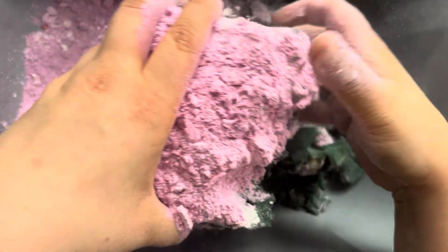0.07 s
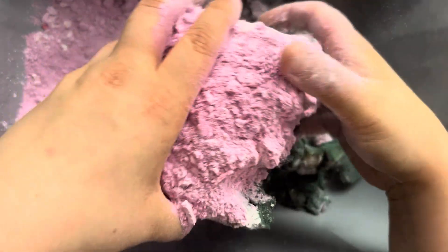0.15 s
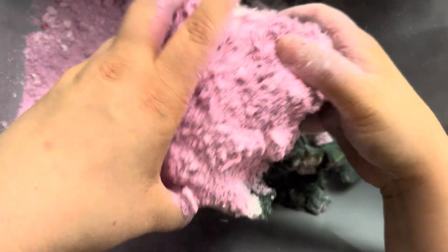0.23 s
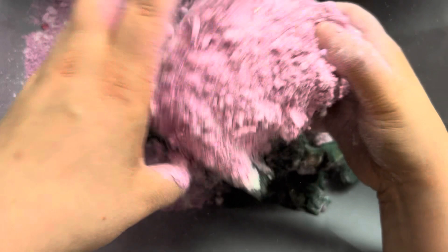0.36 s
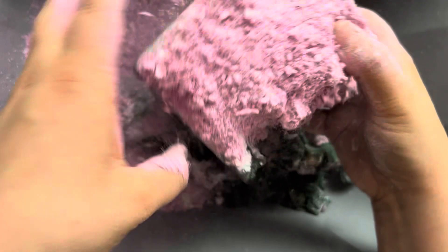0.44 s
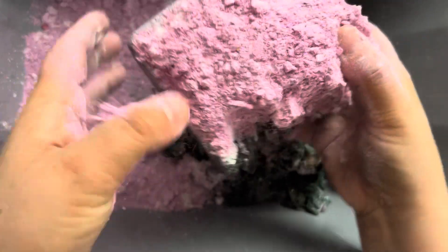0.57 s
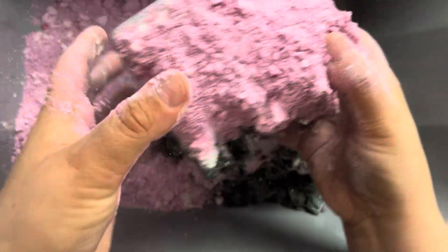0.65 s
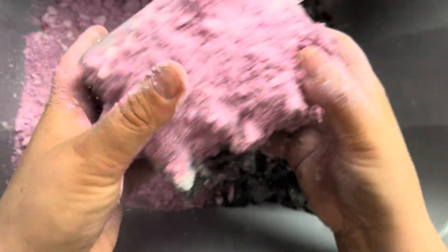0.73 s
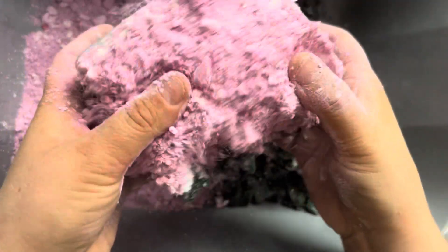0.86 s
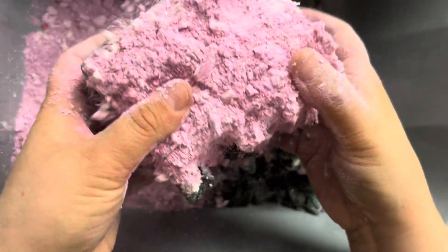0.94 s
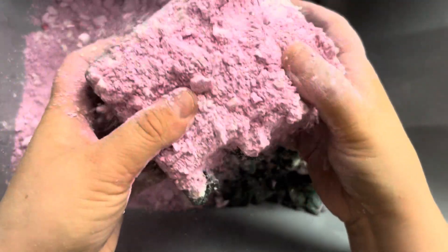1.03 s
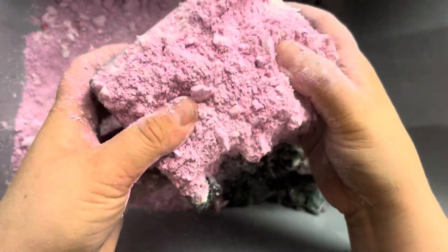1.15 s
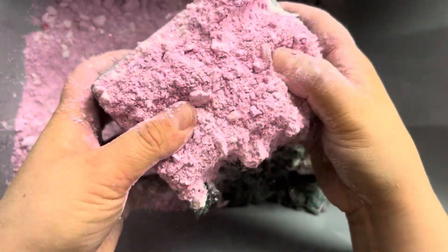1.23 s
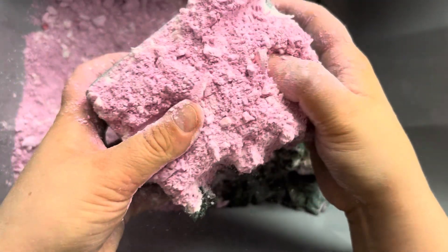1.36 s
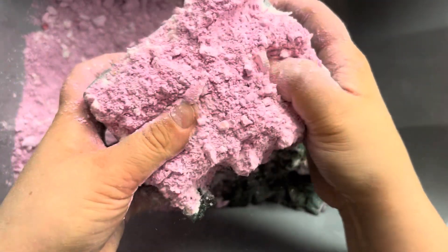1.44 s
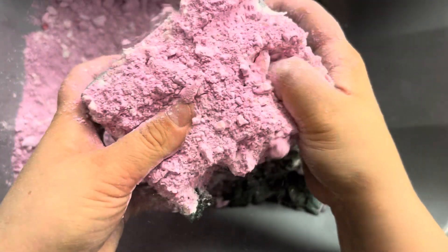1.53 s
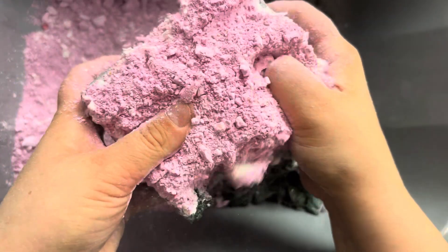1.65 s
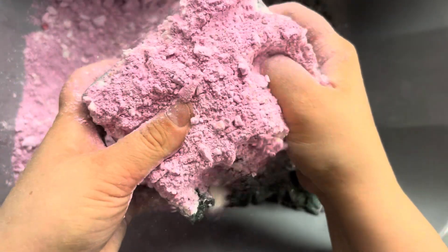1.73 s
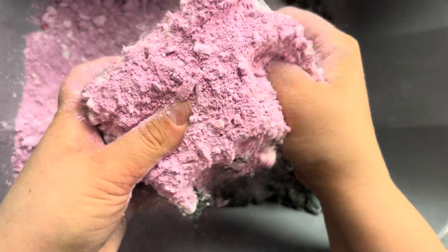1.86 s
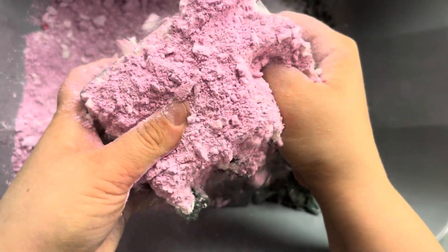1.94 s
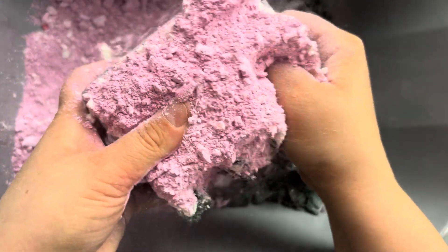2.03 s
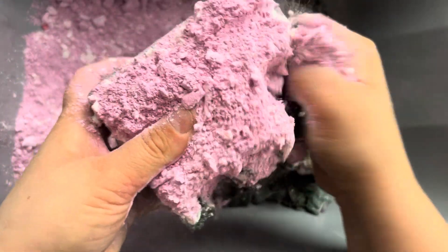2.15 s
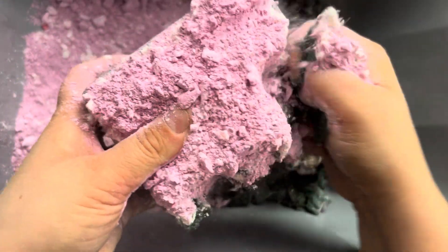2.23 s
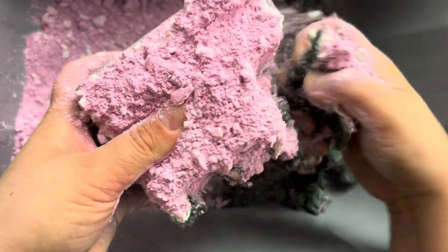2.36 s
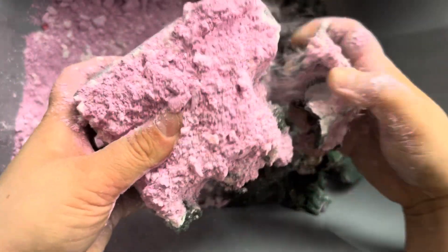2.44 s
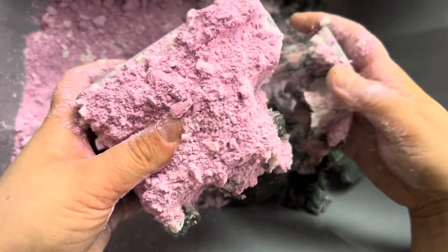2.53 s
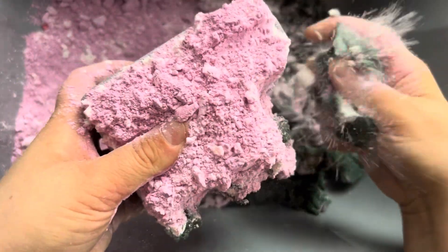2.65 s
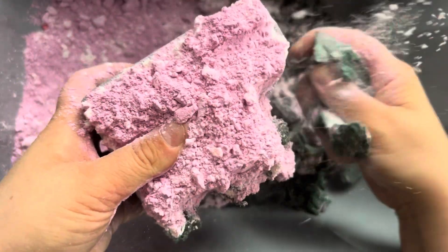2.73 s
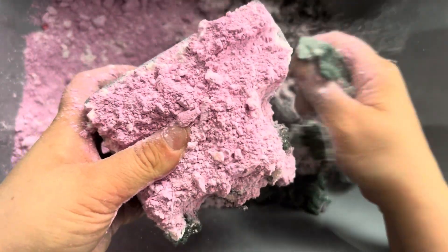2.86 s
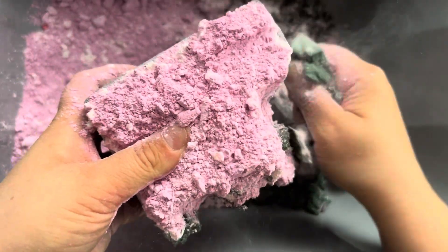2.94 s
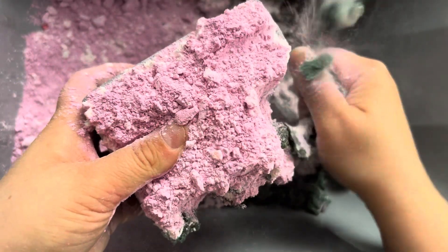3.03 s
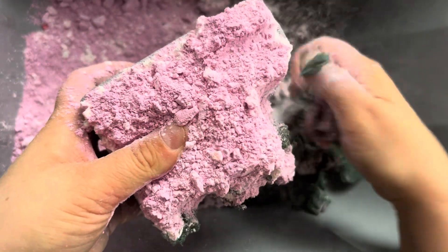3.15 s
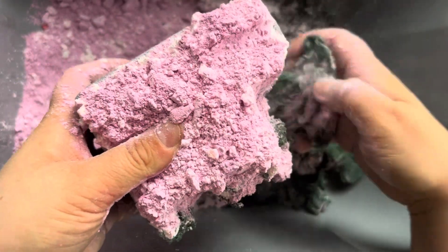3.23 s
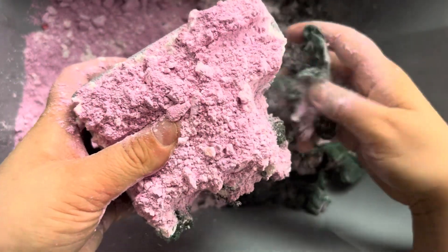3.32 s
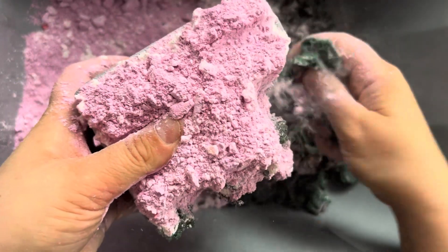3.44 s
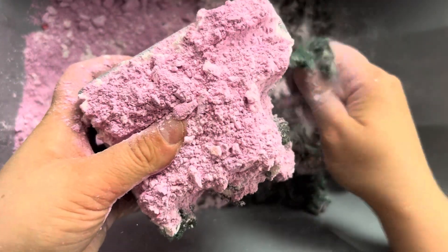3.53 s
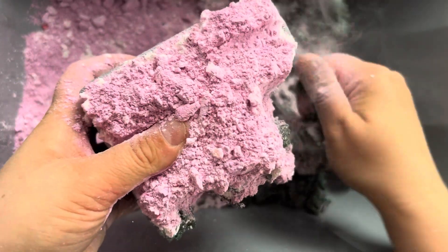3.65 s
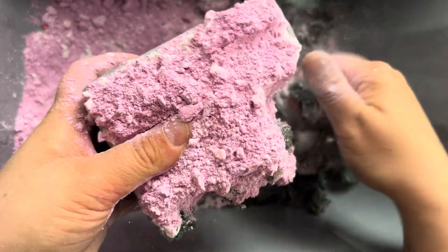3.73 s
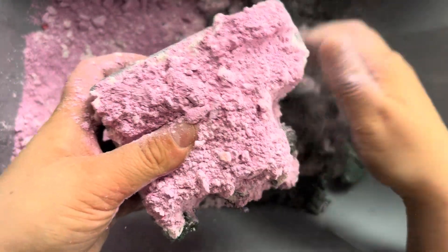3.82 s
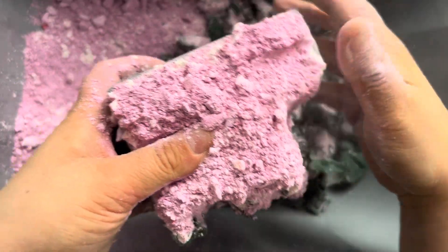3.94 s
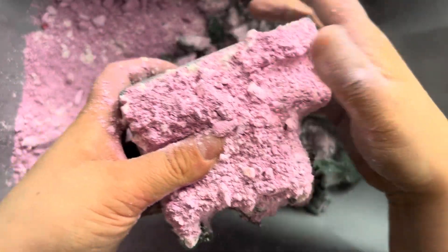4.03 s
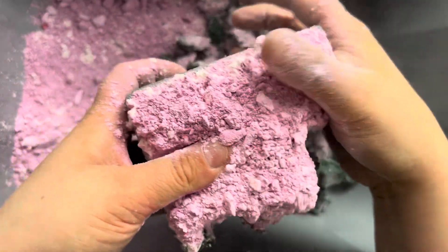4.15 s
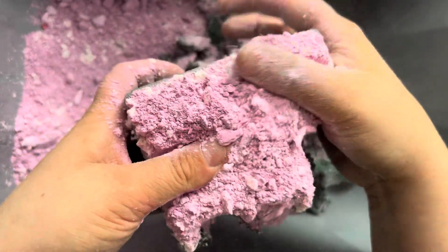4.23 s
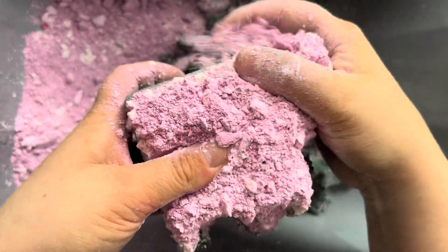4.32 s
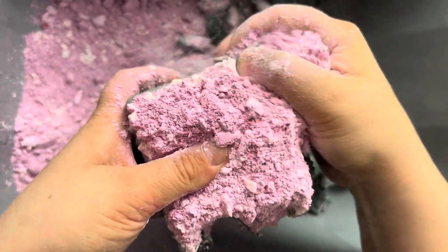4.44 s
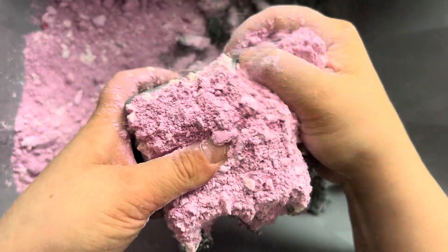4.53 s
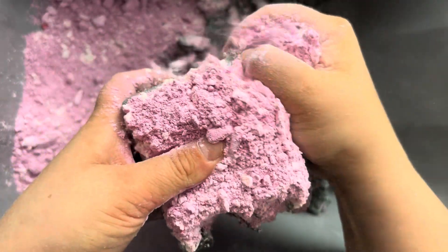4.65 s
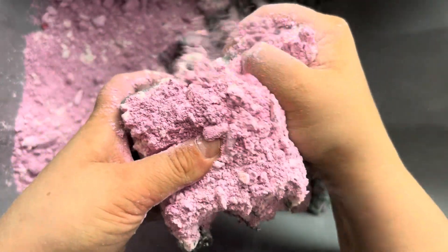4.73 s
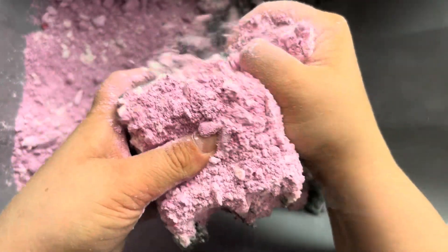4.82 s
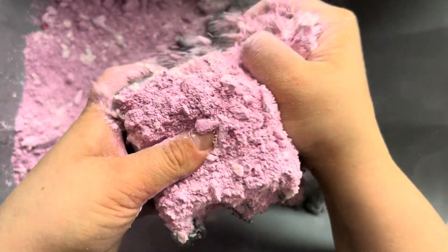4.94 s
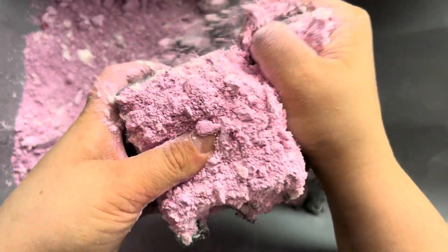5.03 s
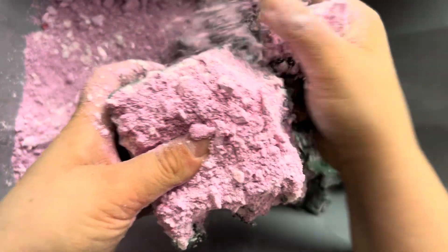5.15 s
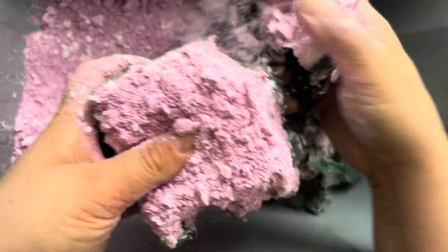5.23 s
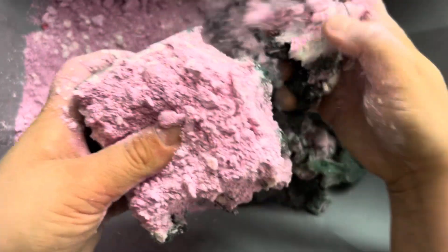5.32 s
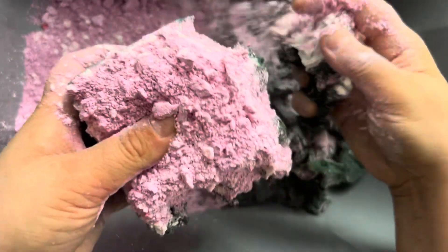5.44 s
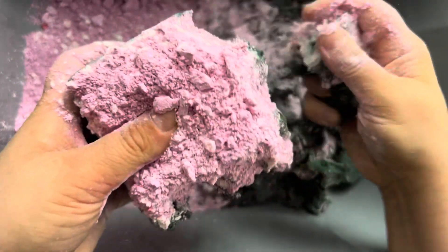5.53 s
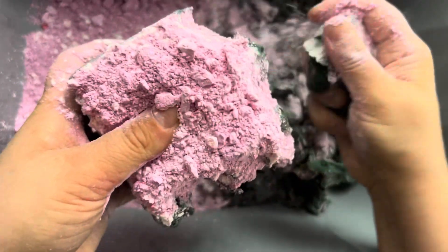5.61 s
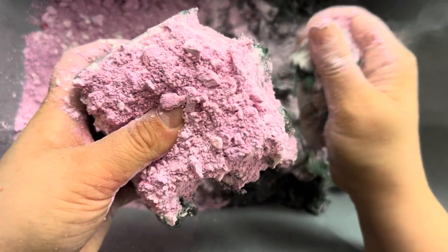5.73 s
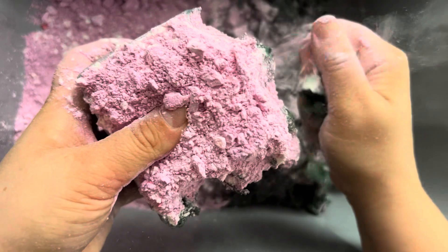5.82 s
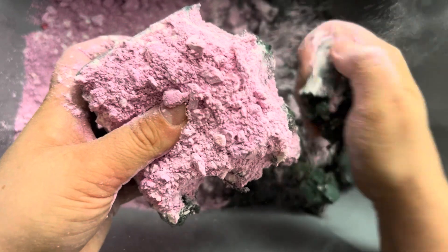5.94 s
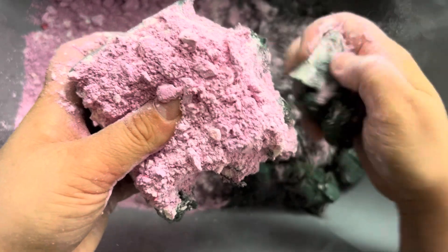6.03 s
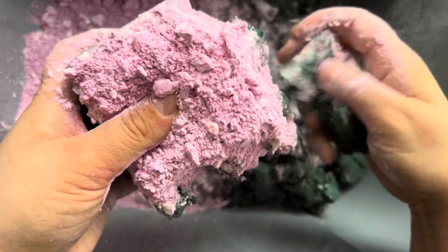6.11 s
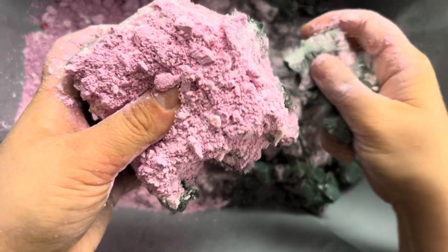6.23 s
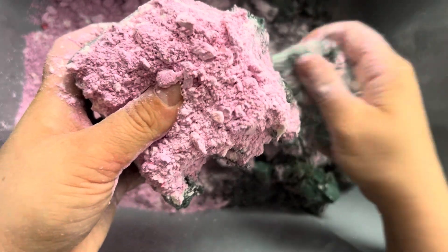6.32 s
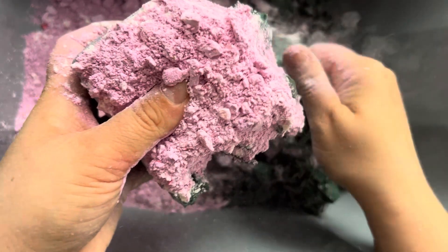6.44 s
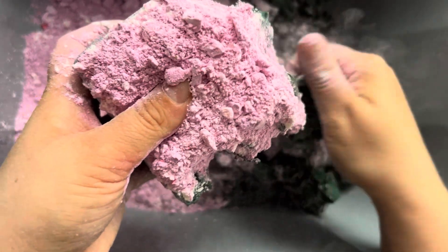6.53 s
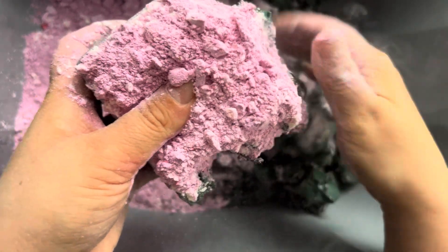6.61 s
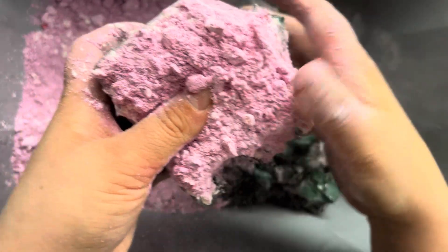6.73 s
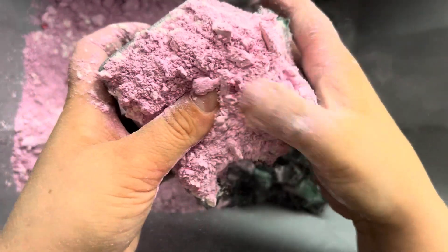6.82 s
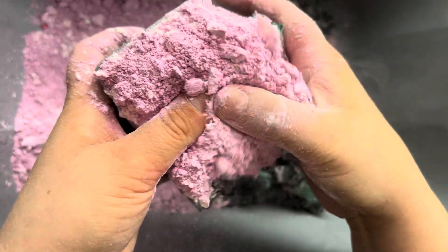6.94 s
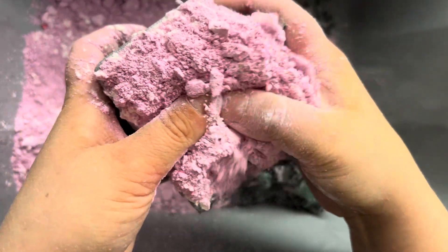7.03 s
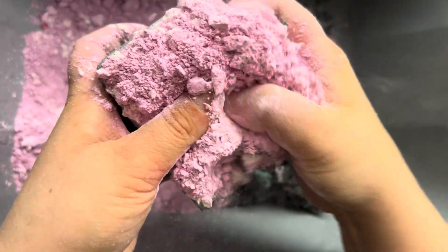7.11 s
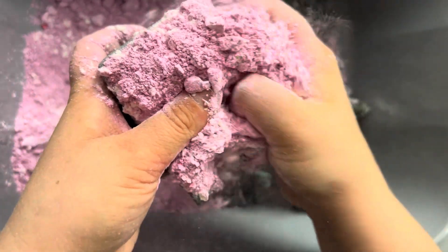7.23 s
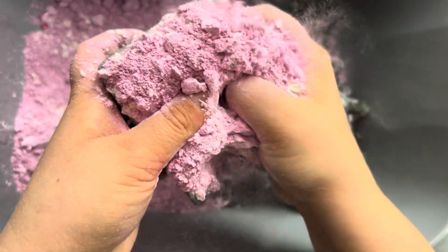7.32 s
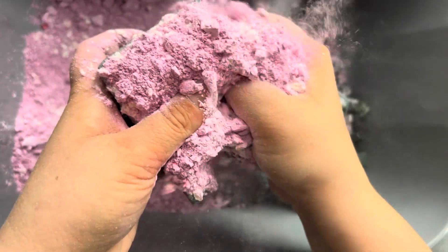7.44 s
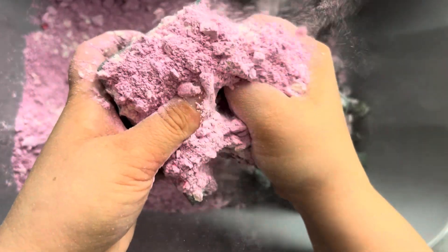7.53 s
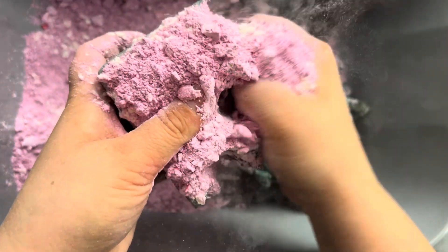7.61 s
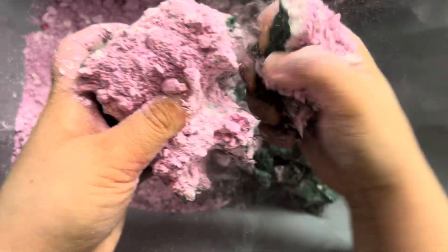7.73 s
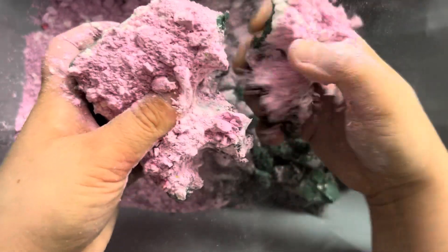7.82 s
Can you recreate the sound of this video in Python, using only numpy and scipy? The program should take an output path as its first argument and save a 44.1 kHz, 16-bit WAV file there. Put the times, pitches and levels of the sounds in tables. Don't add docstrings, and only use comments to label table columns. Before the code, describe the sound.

Brittle dry foam crunches in three strong squeezes, pieces snapping off, with soft powdery crumbling in between, very close in a quiet room.

```python
import sys
import numpy as np
from scipy import signal
from scipy.fft import rfft, irfft, next_fast_len
from scipy.io import wavfile
from scipy.ndimage import map_coordinates

SR = 44100
rng = np.random.default_rng(int(sys.argv[2]) if len(sys.argv) > 2 else 0)


def transcribe(signal):
    frames = np.atleast_2d(signal).T
    limited = np.clip(frames, -1, 1)
    pcm = np.round(limited * 32767).astype(np.int16)
    wavfile.write(sys.argv[1], SR, pcm)


def makeup_ratio(level_db):
    decades = np.asarray(level_db, float) / 20
    return 10 ** decades


N = 347066

# from f/Hz, to f/Hz
CELL_BANDS = [(1500, 5000), (350, 1200), (6000, 15000)]
# f/Hz, level/dB per Hz
BLOCK_SPECTRUM = [(60, -59), (160, -24), (300, -12), (660, -3.5), (1100, -1.5), (2050, 2), (3400, -0.5),
                  (5200, -5), (9000, -12), (16000, -20)]
# f/Hz, level/dB per Hz
CRUMB_SPECTRUM = [(120, -48.5), (416, -11), (650, -5), (1100, -2), (1500, -3.5), (2090, 0), (2450, -2.5),
                  (2900, -0.5), (6200, -8.5), (10000, -17), (16000, -23)]

# t/s, pressure level/dB
SQUEEZE_1 = [
    (1.338, -38),
    (1.368, -31),
    (1.452, -37),
    (1.554, -27),
    (1.635, -34),
    (1.697, -31.5),
    (1.744, -40.5),
    (1.771, -29),
    (1.804, -29.5),
]
SQUEEZE_2 = [
    (4.305, -41),
    (4.385, -33.5),
    (4.56, -37.5),
    (4.617, -33.5),
    (4.66, -44.5),
    (4.695, -29),
    (4.731, -34.5),
    (4.785, -36),
    (4.835, -46),
]
SQUEEZE_3 = [
    (6.9, -54),
    (6.955, -41),
    (6.986, -32),
    (7.063, -22),
    (7.142, -28.5),
    (7.244, -24.5),
    (7.281, -29.5),
    (7.304, -23),
    (7.368, -38.5),
]
SQUEEZE_LARGE_DB = [-7, -7.5, -15]
# start level/dB, end level/dB
SQUEEZE_POWDER_DB = [(-9.5, -4.5), (-9.5, -1.5), (-13, -7)]
PRESS_DB_PER_S, LET_GO_DB_PER_S = 598.5, 422.5

# t/s, level/dB
TEARS = [
    (1.771, -32),
    (1.60, -36),
    (4.756, -36),
    (4.865, -50),
    (4.2, -53),
    (2.925, -55),
    (6.37, -48),
    (1.4, -35.5),
    (7.302, -32.5),
]
TEAR_RISE_S, TEAR_FALL_S = 0.012, 0.054

# peak t/s, rise/s, fall/s, level/dB, powder over it/dB
FINGERING = [(.043, 0.0046, 0.1, -50.5, -19), (.185, 0.13, .022, -50, 1), (.3, .3, .4, -64, -2.5),
             (.585, 0.049, .06, -50.5, -3), (.822, 0.28, .015, -51, -12.5), (1.108, 0.28, .18, -47, -9.5),
             (1.28, .2, .15, -51.5, -8), (1.915, 0.09, .3, -49.5, -5), (2.048, 0.013, .12, -45.5, -4.5),
             (2.16, .3, .02, -49, -30), (2.281, .3, .1, -61, 0.5), (3.951, .003, .12, -48, -8),
             (4.055, 0.064, .035, -45, -4.5), (4.266, 0.15, .05, -48, -8.5), (4.992, 0.15, .058, -45.5, -7),
             (5.1, 0.15, .5, -58, -2.5), (6.708, 0.0032, 0.037, -48, -5.5), (7.535, .03, 0.022, -56.5, 1.5),
             (6.78, .044, .1, -51, -8), (6.87, .06, .065, -49.5, -3.5), (7.417, 0.11, .065, -41.5, -9),
             (7.56, 0.11, .05, -50, -9), (7.65, .12, .45, -58.5, -10), (7.869, 0.46, .1, -59.5, -0.5),
             (4.862, .004, .1, -43, -5), (4.91, .05, .05, -43, -4), (4.845, .05, .05, -52, 3),
             (1.362, .018, .02, -32, -14), (1.398, .02, .03, -34, -14), (1.487, .015, .02, -36, -10),
             (4.764, .012, .006, -30, -6), (7.078, .01, .015, -31, -12), (4.716, .01, .02, -37, -8)]
# peak t/s, rise/s, fall/s, level/dB, powder over it/dB
CRUMBLING = [(.705, 0.041, 0.026, -54.5, -2.5), (.64, .1, 0.14, -60.5, 0.5), (3.22, 0.021, .05, -58, 0),
             (5.31, 0.015, .3, -58, -7), (5.73, .2, 0.11, -58, -8), (2.42, 0.34, .3, -62, -3),
             (2.546, 0.012, 0.05, -46, -1), (2.525, .05, .03, -52, 0), (2.691, 0.13, .11, -52.5, 1.5),
             (2.77, .1, .1, -63.5, 11), (2.861, 0.24, 0.12, -51.5, 2.5), (2.94, .3, 0.017, -53.5, 0),
             (3.15, 0.57, .3, -61.5, 0.5), (3.325, 0.015, 0.29, -53, -.4), (3.408, 0.17, 0.135, -55.5, 1),
             (3.55, 0.29, 0.17, -71, 13), (3.665, .3, 0.017, -62, 3.5), (5.447, .135, .2, -51, 3.5),
             (5.587, 0.16, .38, -52, 2.2), (5.98, .2, 0.16, -65.5, -21), (6.048, 0.029, .05, -50, -8),
             (6.173, 0.11, 0.233, -53, -2.5), (6.284, 0.28, 0.149, -55, 2), (6.39, 0.23, 0.04, -54, -2),
             (6.46, .3, .02, -65.5, -3.5)]
STROKE_LARGE_DB = [-11.5, -12.5]
STROKE_DROP_DB, STROKE_ROUND = 14, 1.116
REST_DB = [-70.5, -63.5, -75.5]

# t/s, peak level/dB, ring f/Hz, t60/s
BREAKS = [
    (1.5273, -4.5, 1920, 0.015),
    (1.5625, 0, 2200, 0.0054),
    (1.6571, -14, 3460, 0.0095),
    (1.7618, 0.5, 1330, 0.02),
    (7.1654, -10, 2840, 0.0046),
    (7.2875, -14.5, 930, .012),
    (7.2971, -2, 2980, 0.012),
    (7.3117, 1, 3150, 0.015),
]
# t/s, peak level/dB, ring f/Hz, t60/s
KNOCKS = [(4.7526, -11, 1150, 0.016), (1.5416, -14, 1350, .0047), (1.5941, -16, 1500, 0.0037),
          (1.6924, -15, 3500, 0.0085), (2.5402, -30, 1260, .013), (4.5784, -12, 1540, 0.0101),
          (4.5941, -21, 3010, 0.008), (4.6932, -18, 3600, 0.0095), (4.8587, -29, 1100, 0.017),
          (6.7165, -35.5, 2390, 0.027), (6.8366, -40, 2850, .018), (7.5394, -44, 826, .019)]
# t/s, peak level/dB, ring f/Hz, t60/s
SNAPS = [(0.4847, -39, 4500, 0.0081), (0.5142, -39, 4470, 0.014), (.9116, -42, 3500, 0.011),
         (.9805, -29, 4300, 0.0042), (1.0336, -35, 3000, 0.0063), (3.1251, -44.5, 3400, .015),
         (5.1153, -39, 5480, .007), (5.4728, -32, 2410, .01), (5.566, -30, 3820, 0.013),
         (2.029, -39, 3680, .012), (1.662, -19, 3600, 0.012), (1.7245, -23, 2400, 0.0085),
         (1.804, -16, 4130, 0.0087), (1.8145, -21.5, 3170, 0.008), (1.9915, -40, 2910, 0.012),
         (2.5223, -31, 3600, .007), (2.6786, -31, 4390, .014), (2.729, -36, 4930, .008),
         (2.8535, -37.5, 2000, 0.018), (2.8661, -36.5, 3100, .02), (4.6225, -13.5, 1980, 0.011),
         (4.6734, -21, 3510, 0.009), (4.734, -18.5, 2390, .013), (4.7504, -7.5, 2700, .017),
         (5.3981, -39.5, 1870, 0.013), (5.433, -30.5, 3120, 0.011), (5.4437, -28, 5020, 0.012),
         (5.455, -35, 1960, 0.014)]
# t/s, peak level/dB, ring f/Hz, t60/s
TICKS = [(0.038, -55, 1720, .043), (.3834, -36.5, 2400, 0.008), (0.705, -45.5, 1210, 0.04),
         (6.228, -38, 2500, 0.01), (1.0636, -35, 3530, .0074), (1.4897, -23, 2150, 0.011),
         (1.6736, -20, 3520, 0.0096), (2.0442, -25, 2970, 0.02), (2.0501, -23.5, 4930, 0.014),
         (2.0622, -19.5, 1750, .016), (2.6916, -25, 3800, 0.011), (2.7597, -33, 4330, .007),
         (4.345, -25, 1870, 0.012), (4.681, -16, 1310, 0.015), (4.7047, -11, 3000, 0.015),
         (4.762, -25, 4200, 0.025), (4.9803, -22.5, 4500, 0.0097), (5.5818, -26, 5550, 0.011),
         (6.2155, -36, 2140, 0.0073), (6.9027, -29.5, 3150, 0.0097), (6.9981, -18, 1870, 0.0061),
         (7.036, -8, 2300, 0.0042), (7.0429, -9.5, 3170, 0.0099), (7.0605, -11, 2270, 0.042),
         (7.2202, -19, 2730, 0.0066), (7.2693, -19, 1940, 0.013), (7.3397, -14.5, 1990, 0.0097),
         (7.4143, -28, 1940, 0.0073)]
# t/s, peak level/dB, ring f/Hz, t60/s
CREAKS = [(1.0447, -35, 1490, 0.02), (1.1982, -27, 1400, 0.011), (1.23, -36, 1380, .018),
          (1.2726, -25, 1380, .014), (1.2835, -34, 1510, 0.0081), (1.2984, -35, 1850, .016),
          (1.3102, -31, 1700, 0.0068), (1.3255, -28.5, 1110, 0.0098), (1.4399, -24.5, 1580, 0.018),
          (2.313, -46.5, 900, 0.013), (4.1734, -34, 2590, 0.01), (4.1816, -37.5, 2040, 0.01),
          (4.2132, -29, 1760, 0.012), (4.2245, -38, 1600, 0.0085), (4.2384, -37, 1100, .016),
          (4.2443, -29, 1700, 0.0068), (4.2657, -25.5, 1270, 0.019), (4.2767, -29, 1900, .011),
          (4.287, -25, 1400, 0.013), (4.3023, -25, 1810, 0.011), (6.9204, -33, 1354, 0.013),
          (6.9603, -30, 1920, .012)]
# t/s, peak level/dB, ring f/Hz,
# t60/s
SPLINTERS = [(4.7518, -8, 2750, .012), (4.7534, -8, 2700, .014), (4.6877, -20, 2900, .006),
             (4.6905, -17, 2400, .008), (4.7052, -18, 1100, .014), (4.7635, -19, 3900, .01),
             (4.7345, -20, 6500, .012), (4.909, -29, 3500, .008), (4.8965, -30, 3200, .008),
             (1.7635, -3.5, 1200, .012), (1.5283, -13, 3200, .012), (1.5795, -22, 1100, .012),
             (1.6025, -20, 4500, .008), (1.7105, -23, 1200, .01), (1.7885, -18, 2000, .01),
             (1.3195, -32, 1300, .007), (1.2545, -43, 1600, .01), (1.3638, -20, 4130, .01),
             (1.3423, -25, 1440, .01), (1.396, -23, 1500, .008), (2.5415, -28, 2150, .014),
             (2.659, -42, 2030, .012), (2.6975, -31, 3300, .008), (2.693, -40, 1200, .012),
             (2.8216, -37, 2870, .008), (2.855, -32, 3700, .008), (2.8675, -32, 2200, .008),
             (2.9159, -45, 1270, .02), (7.069, -13, 3000, .006), (7.2948, -18, 2000, .008),
             (7.2985, -12, 4200, .014), (7.3075, -18, 2500, .005), (7.1845, -18, 2500, .008),
             (6.9733, -24, 1820, .008), (7.013, -22, 3500, .006), (7.3135, -10, 2300, .015),
             (5.5795, -29, 4500, .01), (4.6155, -23, 3000, .006), (4.621, -20, 2200, .008),
             (2.5465, -33, 2100, .012)]
# low part level/dB, bright part level/dB
KIND_DB = [(-13.5, -30), (-7.5, -19), (-20.5, 3.5), (-30, -30), (-13, -21), (-20, -8)]

# t/s, length/s, f/Hz, level/dB
SQUEAKS = [(0.043, 0.0055, 1800, -45), (0.063, 0.008, 1640, -41.5), (0.08, 0.0057, 1800, -50),
           (4.99, 0.071, 1740, -48.5), (5.724, 0.026, 3000, -53.5), (5.55, 0.29, 1900, -60.5),
           (4.045, .03, 3040, -46), (7.065, 0.028, 2260, -27.5), (6.23, .06, 3100, -57),
           (5.85, 0.079, 2970, -62), (6.363, 0.02, 1220, -56), (7.078, .008, 2200, -25)]
# t/s, f/Hz, level/dB
THUMPS = [(1.7625, 260, -24), (4.859, 330, -36), (2.541, 400, -44), (4.752, 300, -33), (4.75, 55, -40),
          (7.313, 73, -27), (7.315, 159, -31.5), (1.763, 75, -40), (1.563, 170, -42), (4.705, 90, -48),
          (1.274, 300, -48)]

# f/Hz, sharpness, depth (to 1, below 0 a boost)
TRAY_DIPS = [(645, 8, -.6), (500, 5, .3), (900, 4.5, 0.49), (1580, 6, 0.3), (2417, 8.2, 0.24),
             (4830, 6.6, 0.15)]
BASIN_DB, BASIN_T60_S = -15, .04

# f/Hz, level/dB per Hz
HISS_SPECTRUM = [(15, -39.5), (25, 1), (242, -1.5), (285, -1), (384, -2.5), (516, -6), (818, -8.5),
                 (16000, -36.5)]
HISS_DB, LOW_CUT_HZ = -68, 76


def unit(x):
    return x / np.sqrt(np.mean(x ** 2) + 1e-20)


def along(points, hz):
    f, v = np.transpose(points)
    return np.interp(np.log(hz + 1), np.log(f + 1), v)


def wobble(rate):
    knots = rng.standard_normal(int(N * rate / SR) + 4)
    return map_coordinates(knots, [np.arange(N) * rate / SR], order=1)


def filtered(x, response):
    m = next_fast_len(len(x) + 4096)
    return irfft(rfft(x, m) * response(np.fft.rfftfreq(m, 1 / SR)), m)[:len(x)]


def ring(hz, q):
    return lambda f: 1j * f * hz / q / (hz * hz - f * f + 1j * f * hz / q)


def causal(spectrum):
    cep = irfft(np.log(makeup_ratio(along(spectrum, np.fft.rfftfreq(4096, 1 / SR))) + 1e-6))
    cep[1:2048] *= 2
    cep[2049:] = 0
    h = irfft(np.exp(rfft(cep)))[:2048]
    return h / np.linalg.norm(h)


def bursts(per_second, spread_db):
    u, e, sign = rng.random(N), rng.exponential(size=N), rng.standard_normal(N)
    edge = np.clip((per_second / SR - u) * SR / 100, 0, 1)
    at = edge > 0
    edge[at] *= makeup_ratio(spread_db * np.minimum(e[at], 3)) * np.tanh(sign[at])
    return unit(edge)


def cells():
    levels = handling()
    effort = np.clip((levels[0] + 52.5) / 12, 0, 1)
    middle, large, fine = levels - effort * shares(BLOCK_SPECTRUM) - (1 - effort) * shares(CRUMB_SPECTRUM)

    clumps = makeup_ratio((0.23 + .5 * effort) * wobble(45))
    jagged = np.clip(unit(runs(180, length=0.0029)), 0, 2.4)
    clumps = clumps * (1 + (0.11 + 0.09 * effort) * jagged)
    whole = bursts(1800, spread_db=-2.5)
    out = np.zeros(N)
    for pitch in np.geomspace(220, 15000, num=13):
        single = bursts(300 + .45 * pitch, spread_db=1.0)
        pops = (0.19 + 0.043 * effort) * whole + (0.55 + 0.32 * effort) * single
        powder = (.95 - 0.5 * effort) * rng.standard_normal(N)
        own = clumps * makeup_ratio(2.8 * wobble(.03 * pitch + 25))

        to_large = np.interp(np.log(pitch), np.log([900, 1600]), [1, 0])
        to_fine = np.interp(np.log(pitch), np.log([4000, 8000]), [0, 1])
        level = middle + to_large * (large - middle) + to_fine * (fine - middle)
        out += filtered(makeup_ratio(level) * unit((pops + powder) * own), ring(pitch, q=2.6))

    block = signal.fftconvolve(out * np.sqrt(effort), causal(BLOCK_SPECTRUM))
    crumbs = signal.fftconvolve(out * np.sqrt(1 - effort), causal(CRUMB_SPECTRUM))
    return (makeup_ratio(-1.5) * block + makeup_ratio(-4.5) * crumbs)[:N]


def handling():
    t = np.arange(0, N / SR + .002, .001)
    power = makeup_ratio(REST_DB)[:, None] ** 2 * np.ones(len(t))
    squeezes = (SQUEEZE_1, SQUEEZE_2, SQUEEZE_3)
    for rows, large_db, powder_db in zip(squeezes, SQUEEZE_LARGE_DB, SQUEEZE_POWDER_DB):
        s, db = np.transpose(rows)
        db = np.interp(t, s, db)
        db = db - PRESS_DB_PER_S * np.clip(s[0] - t, 0, None)
        db = db - LET_GO_DB_PER_S * np.clip(t - s[-1], 0, None)
        powder = np.interp(t, s[[0, -1]], powder_db)
        power += makeup_ratio([db, db + large_db, db + powder]) ** 2
    for s, db in TEARS:
        power[1] += makeup_ratio(db + stroke(t, s, TEAR_RISE_S, TEAR_FALL_S)) ** 2
    for rows, large_db in zip((FINGERING, CRUMBLING), STROKE_LARGE_DB):
        for peak, rise, fall, db, powder_db in rows:
            sizes_db = np.array([[0], [large_db], [powder_db]])
            power += makeup_ratio(db + stroke(t, peak, rise, fall) + sizes_db) ** 2
    return np.array([np.interp(np.arange(N) / SR, t, 10 * np.log10(p)) for p in power])


def stroke(t, peak, rise, fall):
    u = np.where(t < peak, (peak - t) / max(rise, .002), (t - peak) / max(fall, .002))
    return -STROKE_DROP_DB * u ** STROKE_ROUND


def shares(spectrum):
    power = makeup_ratio(2 * along(spectrum, np.arange(16000.)))
    return np.array([[10 * np.log10(power[lo:hi].sum() / power.sum())] for lo, hi in CELL_BANDS])


def runs(per_second, length):
    decay = np.exp(-np.arange(800) / (length * SR))
    return signal.fftconvolve(np.abs(bursts(per_second, spread_db=2.5)), decay)[:N]


def cracks():
    out, t = np.zeros(N + SR), np.arange(1600) / SR
    kinds = (BREAKS, KNOCKS, SNAPS, TICKS, CREAKS, SPLINTERS)
    rows = [(*row, *kind) for table, kind in zip(kinds, KIND_DB) for row in table]
    draws = rng.standard_normal((len(rows), 2, len(t)))
    for (s, db, hz, t60, low_db, bright_db), (a, c) in zip(rows, draws):
        decay = makeup_ratio(-60 * t / np.clip(t60, .003, .06))
        walls = 11 * t60 * decay * a * makeup_ratio(8 * np.clip(c, -2, 2))
        walls[6] += np.sign(a[0])

        wide = np.interp(db, [-30, -5], [.15, .9])
        dull = np.interp(db, [-30, -8], [1.7, 1]) * np.clip(2500 / hz, .5, 1.3)

        def body(f):
            tone = ring(hz, q=1.6)(f) * ring(hz, q=.7)(f) + wide * ring(2900, q=.8)(f) ** 2
            return tone / (1 + 1j * f * dull / 7000) ** 2

        middle = filtered(walls, body)
        low = filtered(walls, lambda f: ring(660, q=1.7)(f) * ring(650, q=.9)(f) ** 2)
        bright = filtered(walls, lambda f: ring(6800, q=1.2)(f) ** 2)
        parts = ((1.3, middle), (makeup_ratio(low_db - 5), low), (makeup_ratio(bright_db - 4.5), bright))
        crack = sum(gain * part / np.abs(part).max() for gain, part in parts)
        out[round(s * SR):][:len(t)] += makeup_ratio(db) * crack
    return out[:N]


def squeaks():
    out = np.zeros(N + 2 * SR)
    for (s, length, hz, db), noise in zip(SQUEAKS, rng.standard_normal((len(SQUEAKS), SR))):
        t = np.arange(-round(min(2 * length, s, .5) * SR), round(min(2 * length, .5) * SR))
        rub = unit(filtered(noise[:len(t)], ring(hz, q=9)))
        out[round(s * SR) + t] += makeup_ratio(db) * rub * np.exp(-(t / SR / length) ** 2)
    return out[:N]


def thumps():
    out = np.zeros(N + 2 * SR)
    for s, hz, db in THUMPS:
        phase = np.arange(SR // 10) / SR * hz * 2 * np.pi
        out[round(s * SR):][:len(phase)] += makeup_ratio(db) * np.sin(phase) * np.exp(-phase / 2.5)
    return out[:N]


def tray(f):
    dips = [1 - np.clip(depth, -1.5, .9) * ring(hz, sharp)(f) for hz, sharp, depth in TRAY_DIPS]
    return np.prod(dips, axis=0)


def basin(x):
    t = np.arange(SR // 8) / SR
    tail = rng.standard_normal(len(t)) * makeup_ratio(-60 * t / BASIN_T60_S) * (t > .001)
    return x + makeup_ratio(BASIN_DB) * signal.fftconvolve(x, tail / np.linalg.norm(tail))[:N]


def input_hiss():
    noise = rng.standard_normal(N)
    return makeup_ratio(HISS_DB) * unit(filtered(noise, lambda f: makeup_ratio(along(HISS_SPECTRUM, f))))


def scene():
    foam = filtered(basin(cells() + cracks()), tray)
    return (foam + squeaks() + thumps())[None]


def band_limit(x):
    return signal.sosfilt(signal.butter(12, 16430, fs=SR, output="sos"), x)


def record(dry):
    full = dry[0] / (1 + np.abs(dry[0]) ** 8) ** (1 / 8)
    cut = filtered(full, lambda f: (1j * f / (LOW_CUT_HZ + 1j * f)) ** 2)
    band = filtered(cut + input_hiss(),
                    lambda f: np.interp(f, [15750, 15850, 16400, 16450], [1, .06, .06, 0]))
    return band_limit(band[None])


dry = scene()
out = record(dry)
transcribe(out)
```